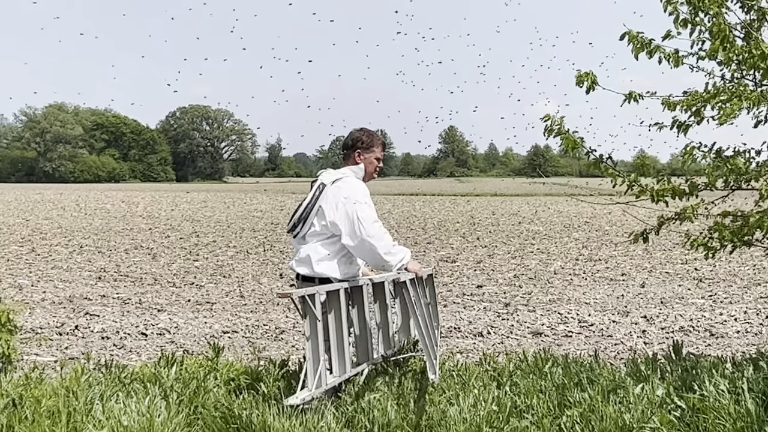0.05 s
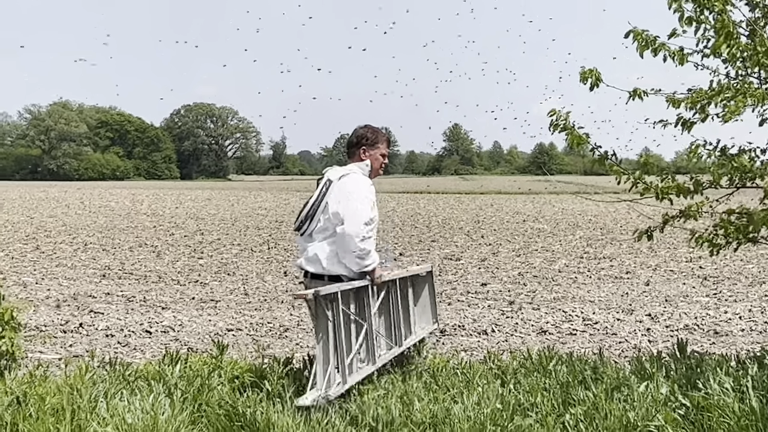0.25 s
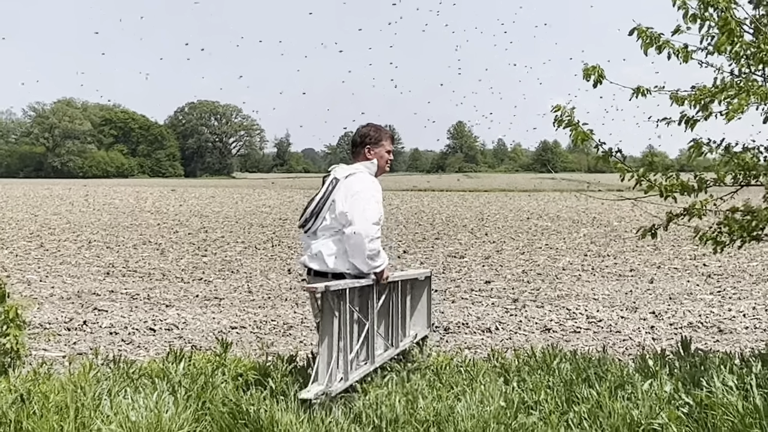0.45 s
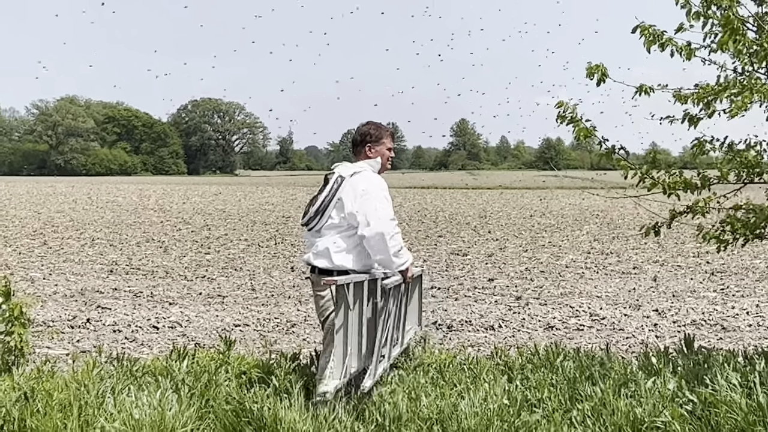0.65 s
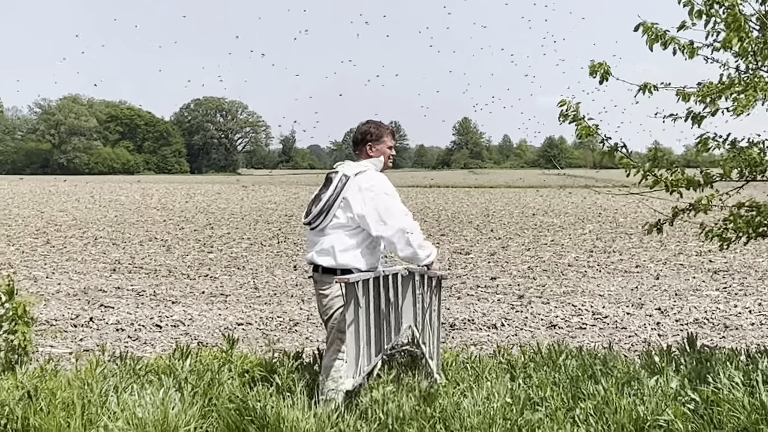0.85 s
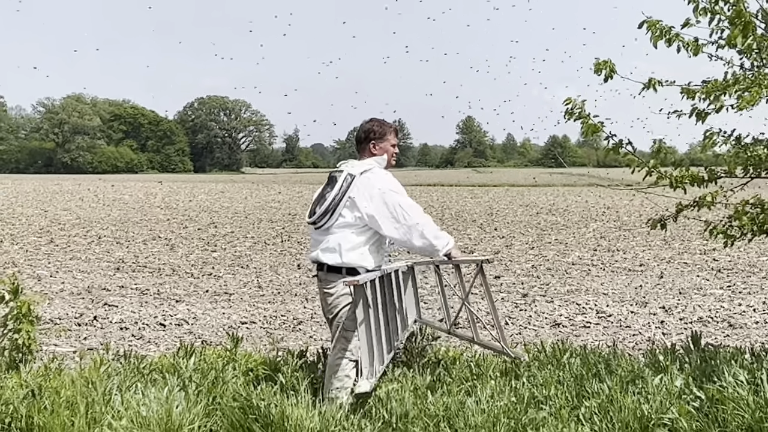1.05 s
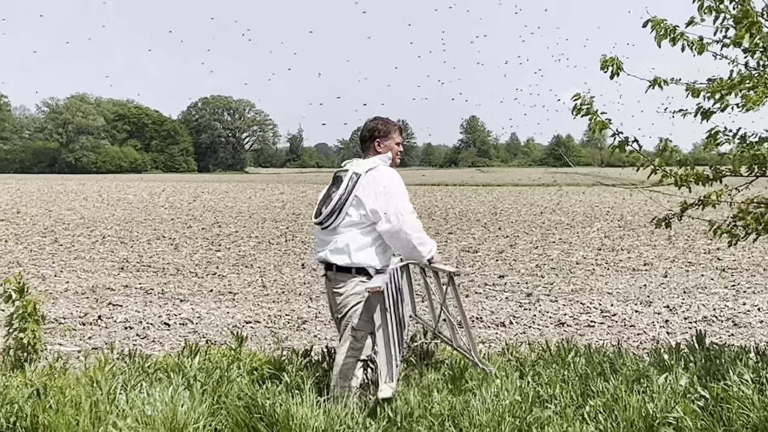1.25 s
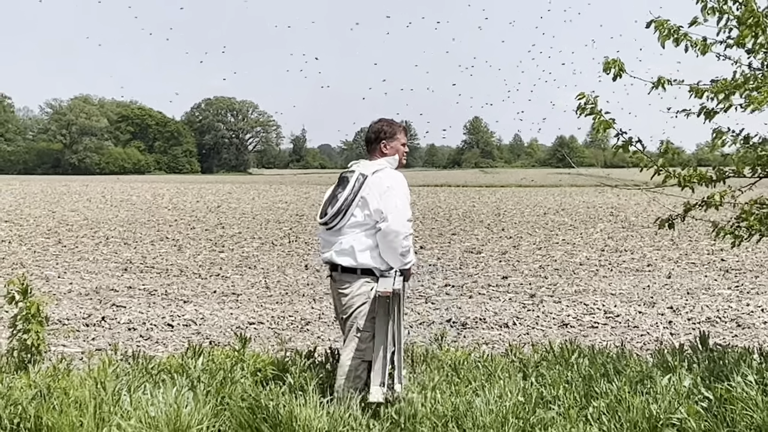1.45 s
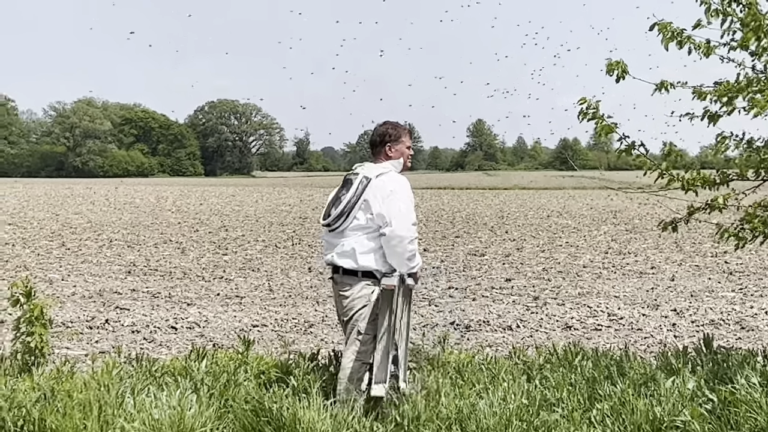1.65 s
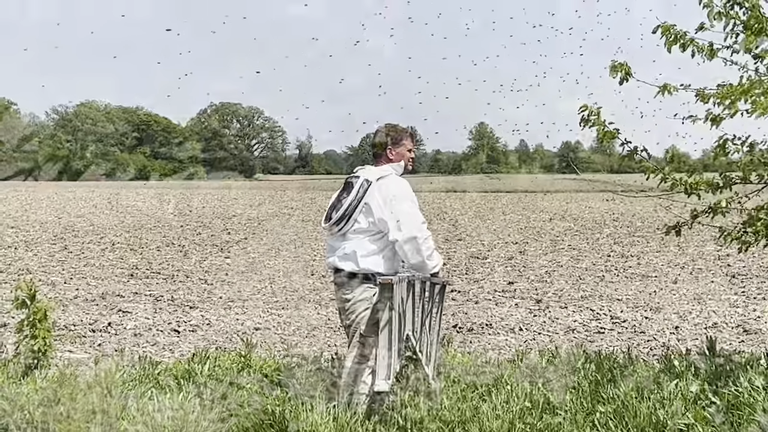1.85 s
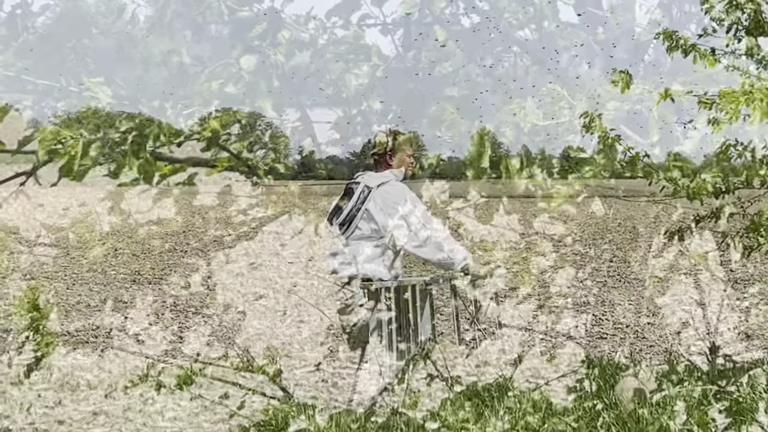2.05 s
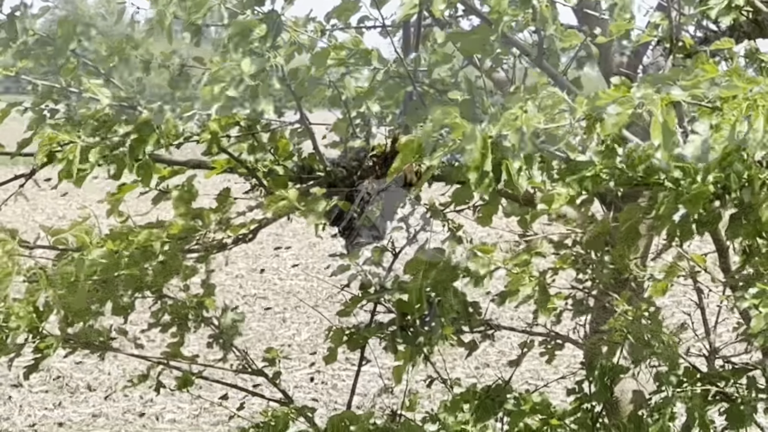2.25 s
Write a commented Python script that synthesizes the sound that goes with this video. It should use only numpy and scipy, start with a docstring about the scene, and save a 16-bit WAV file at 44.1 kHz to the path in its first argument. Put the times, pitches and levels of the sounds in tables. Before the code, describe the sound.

Two loud, ringing clatters of a metal stepladder snapping shut outdoors in gusty wind.

```python
"""Stepladder in a windy field

At the edge of an open field, a few metres from a stereo microphone, an aluminium stepladder is clapped
shut twice. Each time the rails meet in a quick clatter, ring, and rub as they settle; grass and trees
scatter a faint tail. Gusts buffet the microphone with a low, lumpy rumble and die away at the end."""
import sys
import numpy as np
from scipy import signal
from scipy.fft import rfft, irfft
from scipy.io import wavfile
from scipy.ndimage import uniform_filter1d, minimum_filter1d

SR = 44100
rng = np.random.default_rng(int(sys.argv[2]) if len(sys.argv) > 2 else 0)


def persist_wave(psi):
    """Save psi, clipped to +-1, as 16-bit WAV."""
    counts = np.round(np.clip(psi, -1, 1) * 32767).astype(np.int16)
    wavfile.write(sys.argv[1], SR, np.atleast_2d(counts).T)


N = 105840

# Distant open-air hush, its colour: f/Hz, level/dB
HUSH_COLOUR = [(100, -1), (400, -5), (1000, -7), (2000, -19.5), (4000, -26.5), (7000, -27), (10000, -41),
               (13000, -29), (16000, -36)]
# The hush sinks near the end: t/s, level/dB
HUSH_LEVEL = [(1.85, 3.5), (2.15, -2.5)]
# Deep wind rumble on the microphone, its colour: f/Hz, level/dB
RUMBLE_COLOUR = [(15, -37), (30, -14.5), (48, -9.5), (70, -3), (100, -7.5), (150, -11.5), (300, -29.5),
                 (1000, -82.5)]
# Swells of that rumble: t/s, level/dB
RUMBLE_LEVEL = [(0.0, -32), (0.23, -46.5), (0.34, -26.5), (0.48, -23.5), (0.51, -18), (0.6, -31),
                (0.78, -19.5), (0.94, -28.5), (0.98, -22), (1.07, -38), (1.4, -24.5), (1.46, -36),
                (1.5, -22.5), (1.58, -35), (1.75, -26.5), (1.8, -34), (1.83, -26.5), (1.91, -33.5),
                (1.94, -25), (2.08, -36), (2.1, -23), (2.18, -62.5), (2.23, -41.5), (2.4, -67.5)]
# Buffeting at the microphone ports, its colour: f/Hz, level/dB
BUFFET_COLOUR = [(70, -13), (140, 1.5), (300, 1.5), (450, -3), (650, -13), (1000, -25), (1500, -50.5),
                 (2500, -69), (5000, -89)]
# Gusts that drive the buffeting: t/s, level/dB
GUST_LEVEL = [(0.02, -50.5), (0.09, -37), (0.11, -67), (0.22, -56), (0.25, -33.5), (0.38, -21.5),
              (0.4, -30), (0.42, -20.5), (0.44, -30.5), (0.46, -33), (0.49, -14), (0.52, -26.5),
              (0.63, -23), (0.81, -16), (0.86, -33), (0.99, -23.5), (1.08, -36.5), (1.09, -31.5),
              (1.13, -32), (1.19, -19.5), (1.22, -33.5), (1.25, -19), (1.29, -33.5), (1.3, -22.5),
              (1.45, -30), (1.47, -23.5), (1.53, -27), (1.54, -35.5), (1.65, -32.5), (1.69, -31),
              (1.7, -33.5), (1.73, -26), (1.79, -41), (1.84, -20.5), (1.86, -21), (1.87, -28.5),
              (1.93, -17), (1.95, -33), (2.03, -23.5), (2.05, -37), (2.08, -52), (2.09, -22.5),
              (2.19, -60.5), (2.21, -30), (2.29, -59), (2.4, -64.5)]
# Single eddies hitting the microphone: t/s, level/dB, f/Hz, decay/cycles
EDDY_THUMPS = [(0.048, -27.5, 330, 0.42), (0.081, -24, 330, 0.76), (0.367, -13.5, 260, .7),
               (0.380, -7, 507, 0.37), (0.415, -13.5, 240, 0.95), (0.507, -8, 100, 0.9),
               (0.564, -9, 420, 0.54), (0.902, -16.5, 300, 0.35), (0.7168, -5.5, 600, 0.57),
               (0.7725, -11, 552, 0.29), (0.7954, -7, 270, 0.49), (0.811, -3, 290, 0.79),
               (0.839, -14, 392, 0.94), (0.995, -11.5, 380, 0.25), (1.180, -11.5, 405, 0.41),
               (1.241, -15, 400, 0.23), (1.294, -11.5, 430, 0.58), (1.337, -29, 420, 0.29),
               (1.748, -16.5, 331, .4), (1.813, -21, 450, 0.44), (1.886, -18.5, 602, 0.53),
               (1.831, -16, 173, 0.55), (1.856, -13, 330, 0.28), (1.93, -8, 270, 1),
               (2.0242, -18, 850, 0.26), (2.096, -15, 560, 0.38), (2.105, -19.5, 480, .3)]
# How unlike the ladder sounds left and right: f/Hz, side level/dB
SIDE_COLOUR = [(500, -11), (1100, -17), (1800, -27), (3200, -19), (5000, -19.5), (5800, -19), (8000, -10),
               (10000, -33), (12000, -19.5), (15000, -13)]
# Treble phase of the clatter and its tail, left minus right, opposite near 10 kHz: f/Hz, phase/rad
STEREO_PHASE = [(1500, 0), (4600, .5), (5800, -.1), (7400, -.1), (8900, -1.6), (9600, -3.1), (10400, -3.17),
                (12000, -5.2), (13000, -6.2), (14000, -6.3), (15700, -8.8)]
# Loose rails rubbing: t/s, level/dB, half length/s, brightness/(dB per octave)
RAIL_RUBS = [(0.400, -43.5, 0.024, 0), (0.46, -39, 0.036, -4), (0.531, -47, 0.062, -6.5),
             (0.558, -52, 0.0068, 0.5), (0.585, -43, 0.015, -5), (0.614, -54.5, .012, -5),
             (1.081, -53, .018, -5.5), (1.564, -49.5, 0.039, -2), (1.605, -54.5, 0.01, -3.5),
             (1.657, -59.5, 0.0063, 5), (2.199, -70, .006, 4)]
# Broad humps in which the ladder's lesser modes bunch: f/Hz, level/dB
LADDER_COLOUR = [(300, -17), (450, -9), (720, -10), (1000, -1.5), (1180, -2), (1450, 2), (2200, -9.5),
                 (2900, -3), (3550, -13), (4150, -7), (4500, -9), (5000, -7), (6100, -10.5), (7250, -9.5),
                 (8000, -13), (11000, -14), (15500, -20)]
# The ladder's strongest modes: f/Hz
MAIN_MODE_HZ = [834, 974, 1012, 1064, 1254, 1373, 1409, 1448, 1567, 1685, 2668, 3205, 4128, 5028]
# The same modes, in order: level/dB
MAIN_MODE_DB = [-13, -6.5, -1, -3.5, -5, -3, -1.5, -2, 0, -5.5, -9, -11.5, -10, -12]
# Rail striking rail, six times a clap: t/s, level/dB, brightness/(dB per octave), relative crack/dB
RAIL_CONTACTS = [(0.2379, -2, -1.5, -3.5), (0.2388, -2.5, 2.5, 2.5), (0.2472, -0.5, -6.5, -12.5),
                 (0.2605, 0, 0.5, -6), (0.278, -11, -8.5, -12), (0.3280, -18.5, -8, -13.5),
                 (1.4001, -6.5, -4.5, -6), (1.4048, 0, -1.5, -3), (1.409, -1.5, -13.5, -16),
                 (1.4214, -17, 4, -5.5), (1.429, -9, 0.5, -2), (1.442, -8, -2.5, -12)]

HUSH_DB, RUMBLE_DB, BUFFET_DB, WIND_SIDE_DB = -59, 2, -1, -9
EDDY_DB, EDDY_HZ = 3, 73  # depth and rate of the flutter within a gust
EDGE_HZ, EDGE_GROWTH = 460, 0.25  # buffeting above this frequency gains extra dB per dB of gust
CRACKLE_DB, CRACKLE_HZ = 4, 130  # faster flutter of that upper band
TAIL_DB, TAIL_SIDE_DB, TAIL_T60_S, TAIL_DELAY_S, AIR_HZ = -19.5, -17, 0.48, .05, 7500
STIR_HZ = 45  # how fast swaying leaves and grass scramble the tail
RING_DB, CLANG_DB, CHATTER_S, CRACK_S = -24, -14.5, .0022, 0.0051
MODE_T60_S, T60_SLOPE = 0.28, -0.16  # ring time at 1.5 kHz; power of frequency
LOW_CUT_HZ, TOP_HZ, THUMP_TOP_HZ, CEILING = 35, 15800, 1760, .9


def undb(db):
    """Decibels to gain."""
    return 10 ** (np.asarray(db) / 20)


def unit(x):
    """Scale to rms 1."""
    return x / np.sqrt(np.mean(x ** 2))


def curve(points):
    """Join (t/s, value) points by straight lines with rounded corners."""
    return uniform_filter1d(np.interp(np.arange(N) / SR, *np.array(points).T), size=260)


def gain_at(hz, points):
    """Gain of an (f/Hz, level/dB) curve."""
    f, db = np.array(points).T
    return undb(np.interp(np.log(hz), np.log(f), db))


def shape(x, response):
    """Filter by a gain given as a function of frequency."""
    size = 2 * x.shape[-1]
    return irfft(rfft(x, size) * response(np.fft.rfftfreq(size, 1 / SR) + 1))[..., :size // 2]


def colour(x, points):
    """Filter by an (f/Hz, level/dB) curve."""
    return shape(x, lambda f: gain_at(f, points))


def lowpass(x, hz, order):
    """Roll off above hz."""
    return shape(x, lambda f: 1 / (1 + (f / hz) ** order))


def tilt(x, slope_db):
    """Brighten or dull the treble by so many dB per octave."""
    return shape(x, lambda f: undb(slope_db * np.log2(np.hypot(1, f / 2000))))


def noise(points, side_db):
    """Coloured stereo noise with a mid of rms 1."""
    mid, side = (unit(colour(rng.standard_normal(N), points)) for _ in range(2))
    return mid + undb(side_db) * side * np.array([[1], [-1]])


def wander(hz):
    """Smooth random drift of rms 1."""
    return unit(lowpass(rng.standard_normal(N), hz, order=4))


def burst(start_s, decay_s):
    """Noise of unit energy that starts at once and dies away."""
    age = np.arange(N) / SR - start_s
    x = rng.standard_normal(N) * (age >= 0) * np.exp(-np.abs(age) / decay_s)
    return x / np.sqrt(np.sum(x ** 2))


def hush():
    """Open air far from the microphone: a faint bed of noise."""
    return undb(HUSH_DB + curve(HUSH_LEVEL)) * noise(HUSH_COLOUR, side_db=-15)


def wind():
    """Turbulence right at the ports: deep rumble and fluttering buffets that brighten as a gust grows."""
    gust_db = curve(GUST_LEVEL) + EDDY_DB * 2 * np.tanh(wander(EDDY_HZ) / 2)
    flow = noise(BUFFET_COLOUR, WIND_SIDE_DB)
    low = lowpass(flow, EDGE_HZ, order=4)
    edge_db = EDGE_GROWTH * (gust_db + 22.5) + CRACKLE_DB * wander(CRACKLE_HZ)
    buffet = undb(gust_db + BUFFET_DB) * (low + (flow - low) * undb(edge_db))
    rumble = undb(curve(RUMBLE_LEVEL) + RUMBLE_DB) * noise(RUMBLE_COLOUR, WIND_SIDE_DB)
    return buffet + rumble


def thumps():
    """Each strong eddy swings the pressure at the microphone once or twice, with a sharp crest."""
    pressure = np.zeros(N)
    for (when, db, hz, decay), phase in zip(EDDY_THUMPS, rng.random(len(EDDY_THUMPS))):
        cycles = (np.arange(N) / SR - when) * hz
        crest = np.exp(-np.hypot(.25, cycles / decay))
        pressure += undb(db) * np.cos(2 * np.pi * (cycles + phase)) * crest
    return lowpass(pressure, THUMP_TOP_HZ, order=8)


def field_tail(x):
    """Swaying grass and trees send back a faint, dull, diffuse tail."""
    paths = undb(TAIL_DB) * burst(TAIL_DELAY_S, TAIL_T60_S / np.log(1000))
    echoes = signal.fftconvolve(x, paths)[:N]
    stirred = np.real(signal.hilbert(echoes) * np.exp(2j * wander(STIR_HZ)))
    return lowpass(stirred, AIR_HZ, order=2)


def stereo_spread(x):
    """Spread the clatter and its tail: treble phase differs left and right, so it sounds wide and hollow."""
    mid = x + field_tail(x)
    smeared = signal.fftconvolve(x, burst(0, decay_s=0.0087))[:N]
    side = colour(smeared, SIDE_COLOUR) + undb(TAIL_SIDE_DB) * field_tail(x)
    hz, phase = np.array(STEREO_PHASE).T
    return np.array([shape(mid + sign * side, lambda f: np.exp(sign * .5j * np.interp(f, hz, phase)))
                     for sign in (1, -1)])


def rubs():
    """Faint grainy scrapes of rail on rail, in the colour of the ladder."""
    t = np.arange(N) / SR
    grain = unit(colour(rng.laplace(size=N), LADDER_COLOUR))
    return sum(undb(db) * tilt(grain * np.exp(-((t - when) / half) ** 2), bright)
               for when, db, half, bright in RAIL_RUBS)


def ring(hz, gains):
    """Response of the ladder's modes to one tap; higher ones die sooner."""
    t = np.arange(SR // 2) / SR
    t60 = MODE_T60_S * (np.array(hz) / 1500) ** T60_SLOPE
    return sum(gain * np.sin(2 * np.pi * f * t) * np.exp(-rate * t)
               for f, gain, rate in zip(hz, gains, np.log(1000) / t60))


def lesser_modes(count=1100):
    """The many close modes of rails, rungs and braces, sparser towards the treble."""
    place = (np.arange(count) + rng.random(count)) / count
    hz = (np.sqrt(LADDER_COLOUR[0][0]) * (1 - place) + np.sqrt(TOP_HZ) * place) ** 2
    gains = gain_at(hz, LADDER_COLOUR) * hz ** .25 * rng.choice([-1, 1], count)
    return ring(hz, gains / np.sqrt(np.sum(gains ** 2) / 2))


def ladder_claps():
    """Each contact is a blow that rings the main modes, a chatter that rings the rest, and a dry crack."""
    drive = np.zeros((3, N))
    for start, db, bright, crack_db in RAIL_CONTACTS:
        blow = 1. * (np.arange(N) == int(start * SR))
        contact = np.array([blow, burst(start, CHATTER_S), undb(crack_db) * burst(start, CRACK_S)])
        drive += undb(db) * tilt(contact, bright)
    blows, chatter, cracks = drive
    main_modes = ring(MAIN_MODE_HZ, undb(MAIN_MODE_DB) * (-1) ** np.arange(len(MAIN_MODE_HZ)))
    ringing = undb(RING_DB) * signal.fftconvolve(blows, main_modes)[:N]
    clang = undb(CLANG_DB) * signal.fftconvolve(chatter, lesser_modes())[:N]
    return ringing + clang + np.sqrt(SR * CRACK_S) * colour(cracks, LADDER_COLOUR)


def scene():
    """The ladder a few metres away, wind on the microphone, the hush of the field behind."""
    return stereo_spread(ladder_claps() + rubs()) + wind() + thumps() + hush()


def record(dry):
    """The recorder cuts the deepest rumble and the top; a quick limiter holds down the peaks."""
    thinned = shape(dry, lambda f: 1 / np.sqrt(1 + (LOW_CUT_HZ / f) ** 8))
    gain = CEILING / np.maximum(np.abs(thinned).max(axis=0), CEILING)
    held = minimum_filter1d(gain, size=201)
    eased = uniform_filter1d(uniform_filter1d(held, size=101), size=101)
    top_cut = signal.ellip(10, .2, 70, TOP_HZ, fs=SR, output="sos")
    return signal.sosfilt(top_cut, thinned * eased)


dry = scene()
out = record(dry)
persist_wave(out)
```